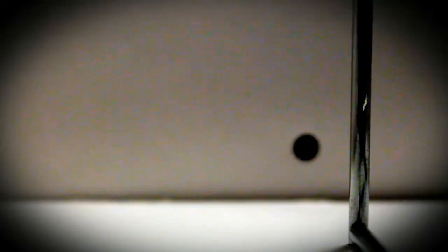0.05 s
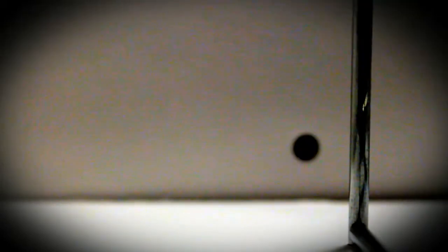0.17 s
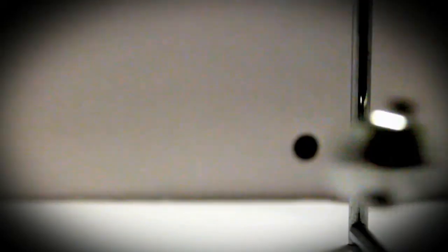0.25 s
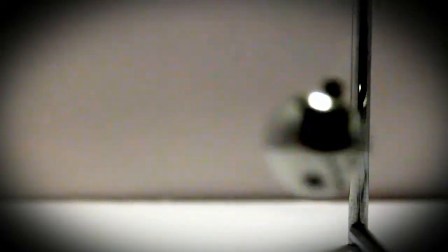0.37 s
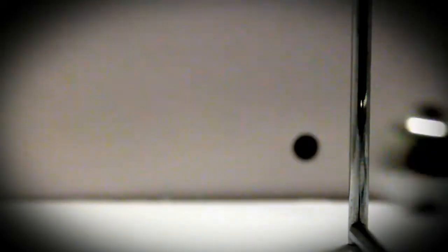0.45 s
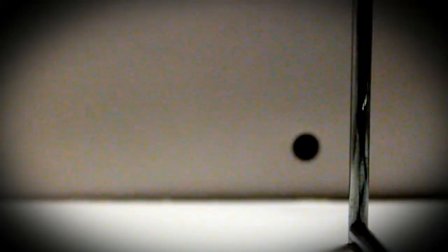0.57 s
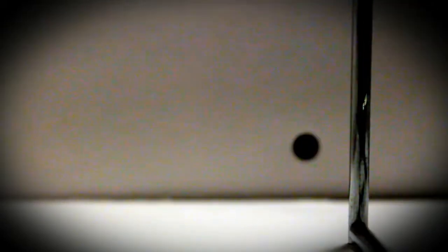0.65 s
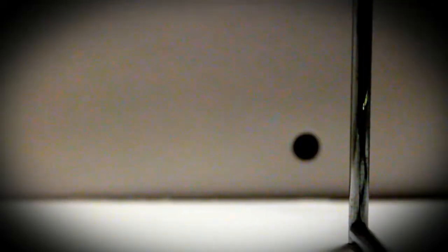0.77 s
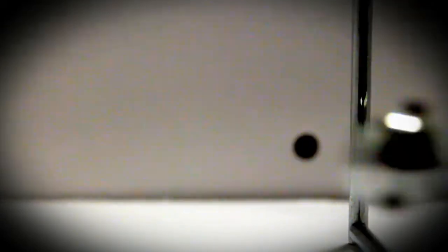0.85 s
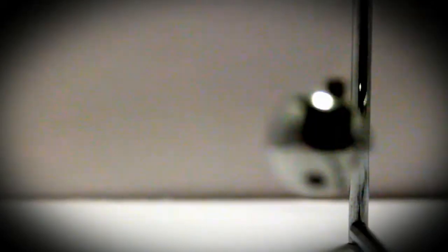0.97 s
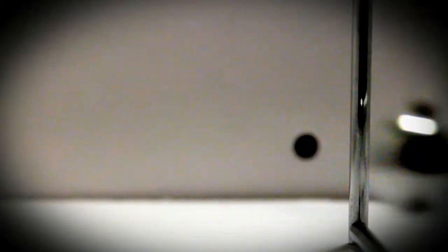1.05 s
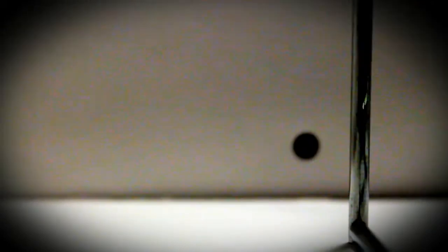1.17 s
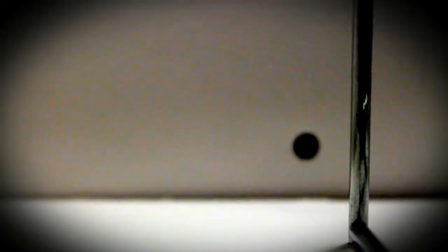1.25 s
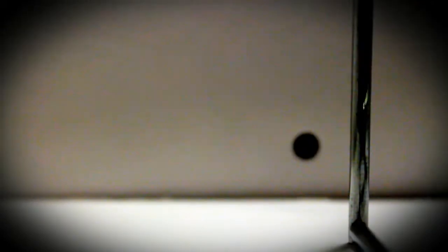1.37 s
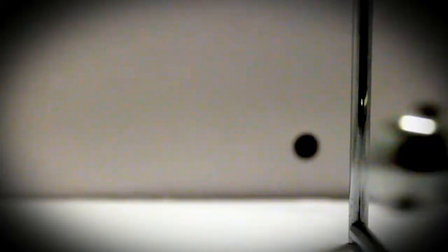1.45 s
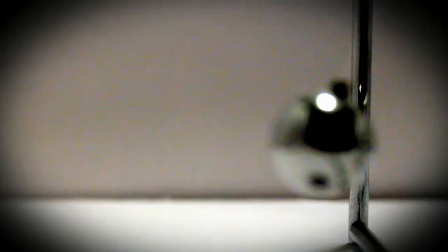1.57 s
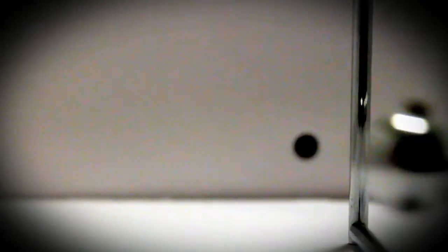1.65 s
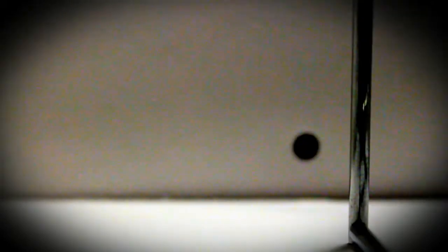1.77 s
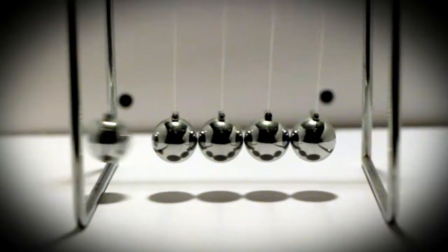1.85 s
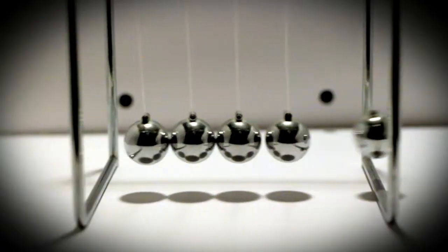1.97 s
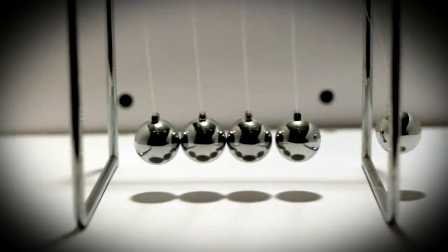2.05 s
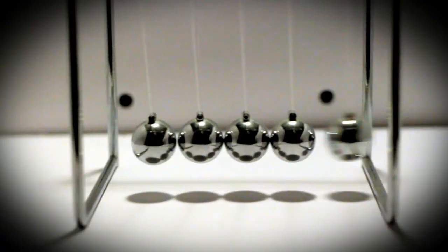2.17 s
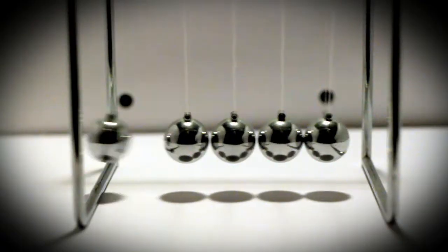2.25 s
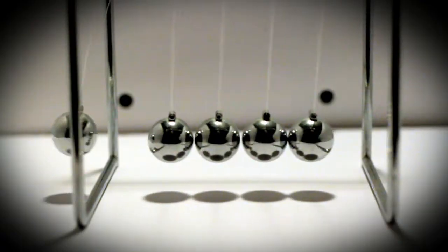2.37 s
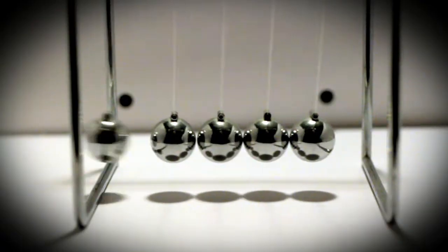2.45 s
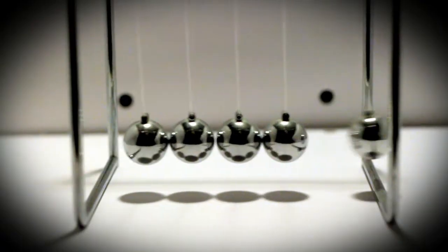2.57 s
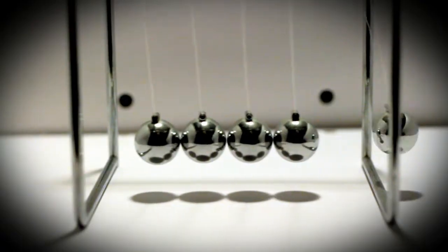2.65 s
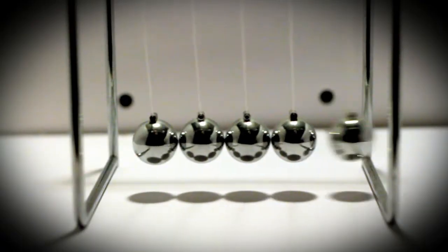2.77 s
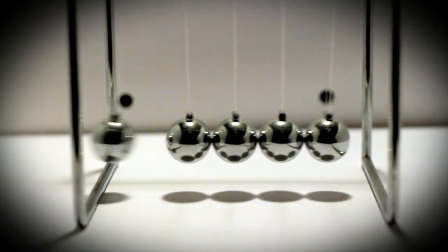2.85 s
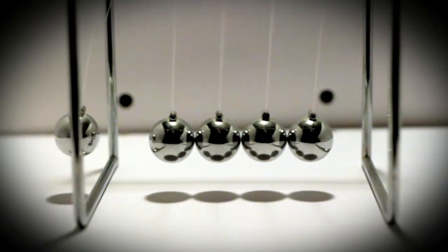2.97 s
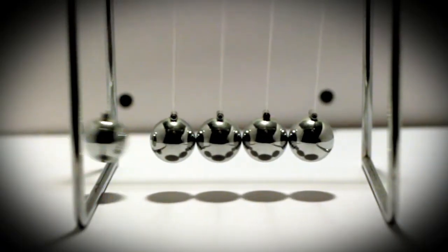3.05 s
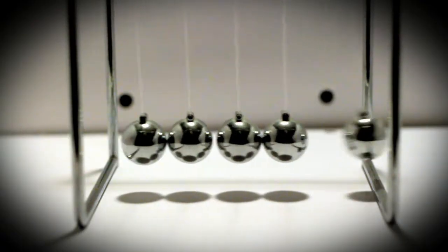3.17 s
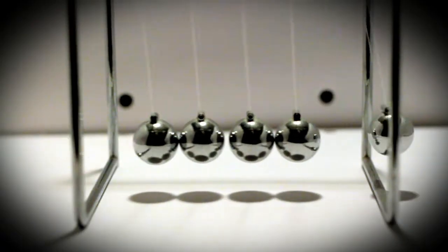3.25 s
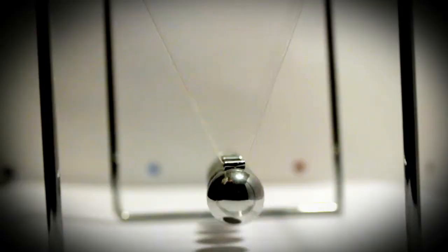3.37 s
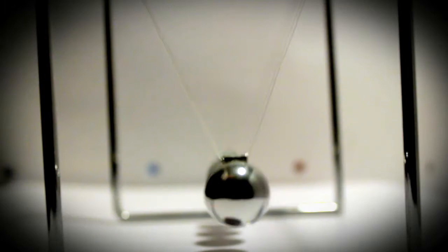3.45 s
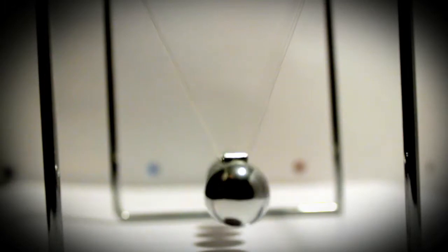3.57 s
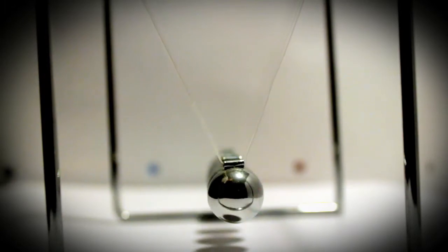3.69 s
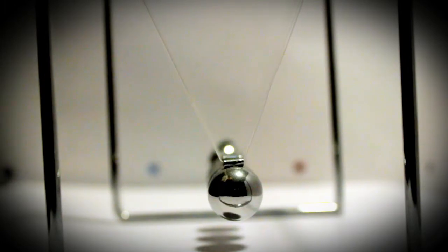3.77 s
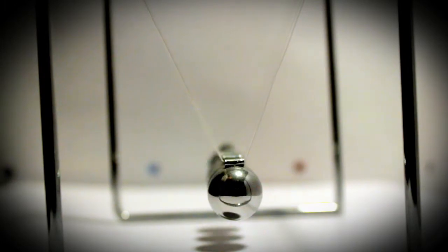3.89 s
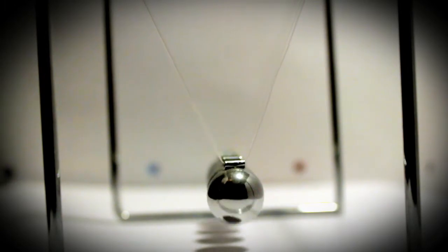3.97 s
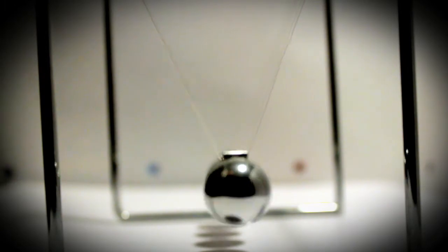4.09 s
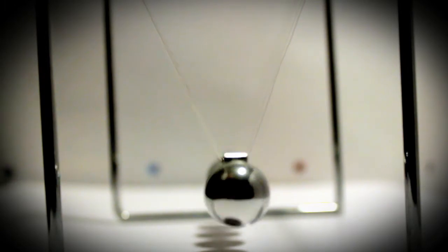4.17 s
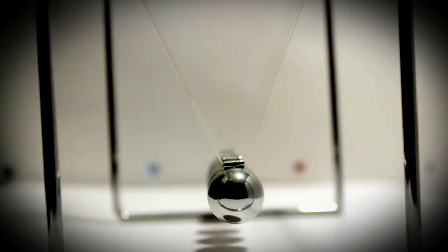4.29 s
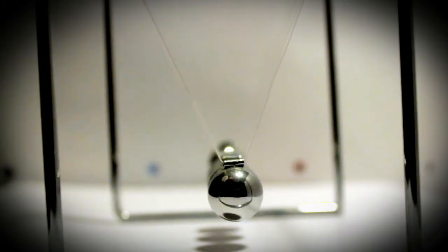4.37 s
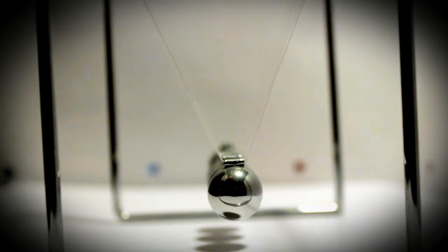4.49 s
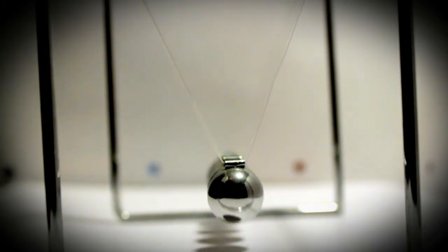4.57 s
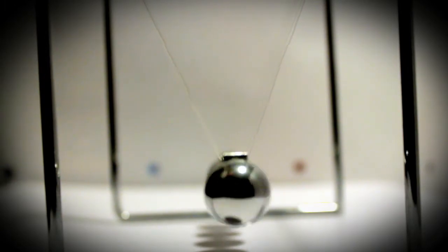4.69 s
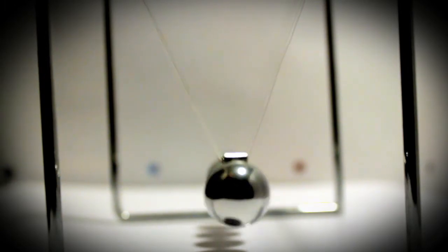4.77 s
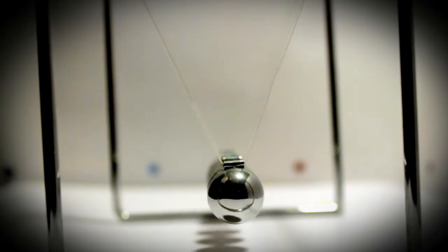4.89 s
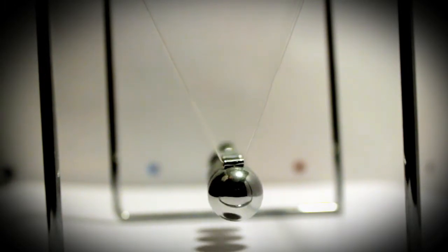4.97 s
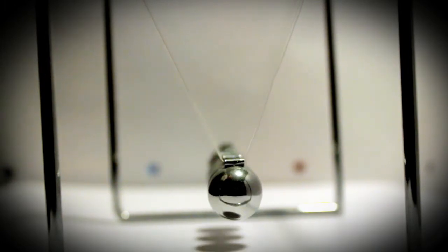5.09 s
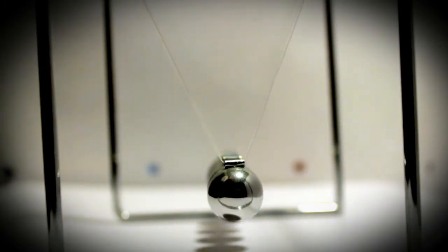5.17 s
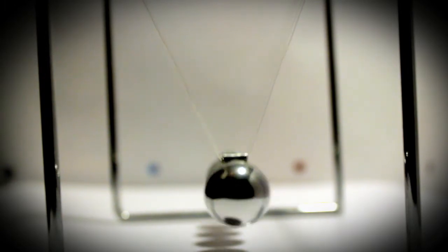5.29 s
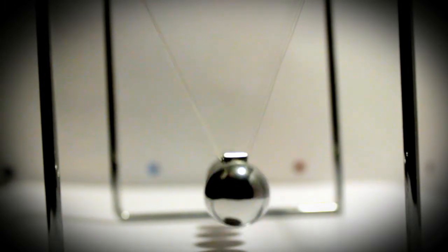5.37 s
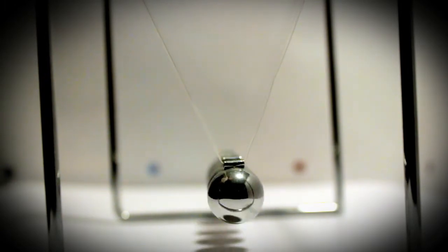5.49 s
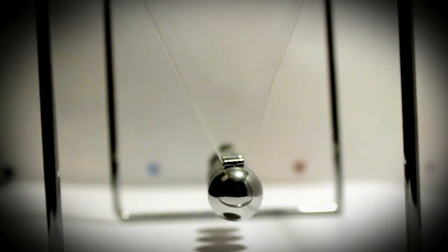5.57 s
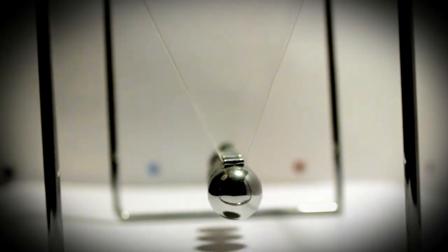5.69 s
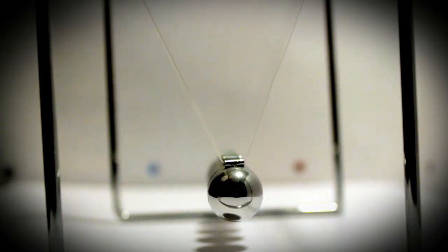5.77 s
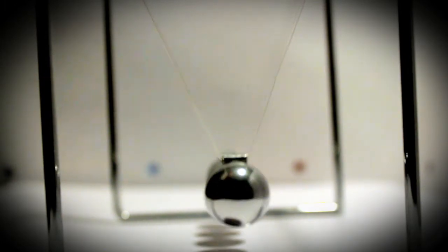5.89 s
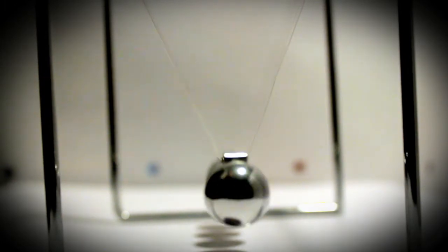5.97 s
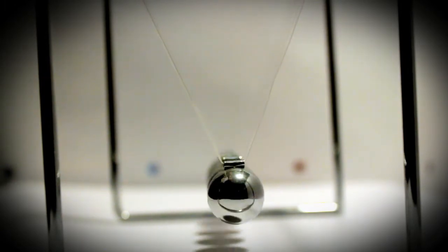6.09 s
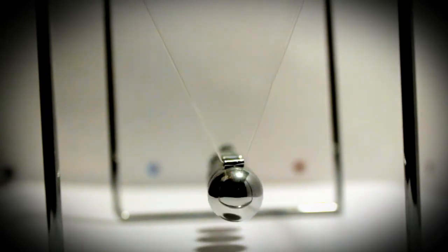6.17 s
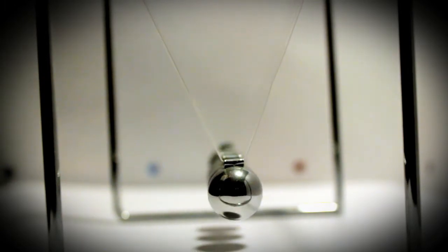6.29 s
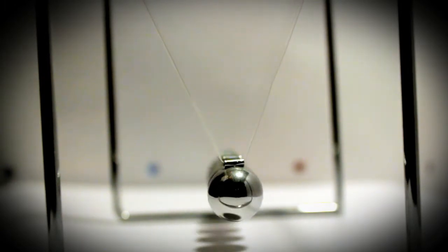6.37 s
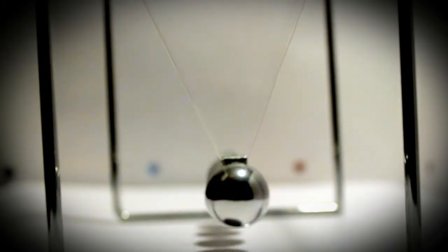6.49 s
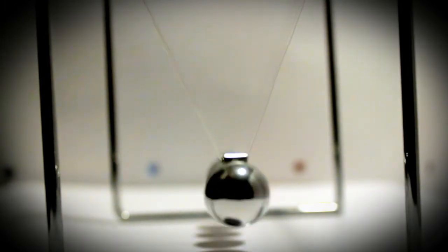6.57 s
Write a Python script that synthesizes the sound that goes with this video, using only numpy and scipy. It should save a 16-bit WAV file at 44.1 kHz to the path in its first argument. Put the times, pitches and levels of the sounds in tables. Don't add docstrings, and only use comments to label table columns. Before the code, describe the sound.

Bright, dry metallic clacks from a row of hanging steel balls, about three per second, gradually weakening over quiet hiss in a small room.

```python
import sys
import numpy as np
from scipy import signal
from scipy.fft import rfft, irfft
from scipy.io import wavfile
from scipy.ndimage import uniform_filter1d

SR = 44100
rng = np.random.default_rng(int(sys.argv[2]) if len(sys.argv) > 2 else 0)


def to_wav(sig):
    pcm = np.clip(np.atleast_2d(sig), -1, 1) * 32767
    pcm = np.round(pcm).astype(np.int16)
    wavfile.write(sys.argv[1], SR, pcm.T)


def boost_factor(decibels):
    exponent = np.asarray(decibels, float) / 20
    return 10 ** exponent


N = 292383
SPAN = 16384
T = np.arange(SPAN) / SR
HZ = np.fft.rfftfreq(SPAN, 1 / SR)
TOP_HZ = 15830

# (frequency [Hz], level [dB])
PULSE = [(1200, -26), (2200, -13.5), (3500, -11.5), (5100, -7), (7000, -3), (9000, -4.5), (11500, 0),
         (13500, -2), (15600, -5), (15950, -17), (16700, -39), (17000, -59)]
DIP_HZ, DIP_WIDTH_HZ, DIP_DB = 4260, 100, -6
# (time [s], strength [dB], level at 3.6 kHz [dB], level at 6 kHz [dB])
LANDINGS = [(.09721, -11, -1.5, -2.5), (.40041, -11.5, 2.3, -.5), (.70196, -13, -0.3, 3),
            (1.0058, -11, -0.7, 0), (1.30669, -10.5, -1, -1.5), (1.60989, -12.5, -0.5, -1.5),
            (1.91027, -12, -3.5, -1.8), (2.21375, -11.5, -0.5, -0.5), (2.51424, -13.5, -0.5, 0),
            (2.81739, -13, -4.5, -0.5), (3.11786, -15.5, 4.5, -3), (3.41975, -14.5, 1.5, -0.5),
            (3.71997, -14, 0.5, -3.5), (4.02404, -16.3, 0, 2.5), (4.32168, -16.5, -1.7, 1.5),
            (4.62446, -16, 0, 0.3), (4.92346, -18.5, 2, 1.5), (5.22607, -16.5, -1.6, 0.5),
            (5.52477, -14, 0.5, -2), (5.82661, -17.5, -4.5, 0.7), (6.1248, -18.5, -1.5, 3.5),
            (6.42593, -18.5, 2, -3)]
RUN_MS = [.5, 1.6, 1.6, .9, .7, 1.3, 2.1, 2.1, 1.2, 1.2, .7, 2.6, 1.5, .3, 1.9, 2.6, 1.7, 1, .9, 1, 1, 1.5]
FACING_HZ = [1500, 3600, 6000, 9500, 14500]
FACING_TOP_DB = -3
GRAZE_S, GRAZE_DB = 4.0209, -21
LEAD = 512
EVEN_BINS = 800


def cradle():
    pulse = gains(HZ, PULSE)
    dip_db = DIP_DB * np.exp(-((HZ - DIP_HZ) / DIP_WIDTH_HZ) ** 2)
    pulse = boost_factor(-0.74 + dip_db) * pulse / irfft(pulse)[0]
    places = np.array([[surroundings(side) for gap in range(4)] for side in (0, 1)])
    chance = rng.standard_normal((len(LANDINGS), 2, 6))
    out = np.zeros(N + SPAN)
    for k, (s, db, low_db, mid_db) in enumerate(LANDINGS):
        start = int(s * SR) - LEAD
        late_s, size = contacts(RUN_MS[k], db, chance[k])
        hits = taps(s + late_s - start / SR, size)
        power = abs(hits.sum(axis=0)) ** 2
        broad = uniform_filter1d(power, size=EVEN_BINS) / boost_factor(db) ** 2
        side, gaps = k % 2, (k // 2 + np.arange(6)) % 4
        blow = hits / np.sqrt(broad) * places[side, gaps]
        facing = gains(HZ, list(zip(FACING_HZ, [0, low_db, mid_db, 0, FACING_TOP_DB])))
        out[start:start + SPAN] += irfft(pulse * facing * blow.sum(axis=0))
    start = int(GRAZE_S * SR) - LEAD
    graze = taps([LEAD / SR], [boost_factor(GRAZE_DB)])[0]
    out[start:start + SPAN] += irfft(pulse * graze * places[1, 0])
    return out[:N]


SECOND_MS, SECOND_SPREAD_MS = .16, .035
RUN_LOSS_DB, CONTACT_SCATTER_DB = -7, 2.2
UNEVEN = .95


def contacts(run_ms, db, chance):
    early = UNEVEN * (1 + np.tanh(chance[0, :4])) / 2
    steps = (np.arange(1, 5) - early) / 4
    second_ms = SECOND_MS + SECOND_SPREAD_MS * chance[0, 4]
    ms = np.r_[0, second_ms, second_ms + steps * run_ms]
    size = boost_factor(RUN_LOSS_DB * np.r_[0, 0, steps] + CONTACT_SCATTER_DB * chance[1])
    return ms / 1000, boost_factor(db) * size / np.linalg.norm(size)


# (delay [ms], share of the direct pulse [1])
NEAR = [(.35, .28), (.612, .8), (.845, .42), (.935, -.3), (1.055, .22), (1.4, .18), (1.68, .25),
        (2.14, .17), (2.61, .16)]
# (frequency [Hz], level [dB])
NEAR_COLOUR = [(1500, -16), (2400, -4.5), (3600, 0.35), (15000, 3.5)]
SCATTER_DB, SCATTER_T60_S = -18, .0145
# (delay [ms], level after left landing [dB], level after right landing [dB], smear [ms], centre [Hz])
WALLS = [(11, -16, -26, .3, 4500), (11.2, -27, -29, .5, 10000), (12.4, -30, -25, .4, 8000),
         (13.3, -21, -21, .5, 14500), (16.6, -15, -20.5, .45, 15000), (17, -30, -31, .5, 11000),
         (21.2, -27, -26, .7, 11500)]
ROOM_DB, ROOM_GAP_DB, ROOM_START_MS = -27.5, -10, 10.4
# (frequency [Hz], T60 [s])
ROOM_T60 = [(2000, 0.12), (5000, 0.19), (10000, 0.17), (15000, 0.14)]
# (frequency [Hz], level [dB])
ROOM_COLOUR = [(1500, -17), (3000, 4.5), (5000, 3.5), (7000, -0.1), (10000, 2), (13000, 5.5), (15800, 10)]


def surroundings(side):
    ms, size = np.transpose(NEAR)
    scatter_grain, room_grain, wall_grain = rng.standard_normal((3, SPAN))
    scatter = rfft(boost_factor(SCATTER_DB) * scatter_grain * fade(T - .0011, SCATTER_T60_S))
    near = (taps(ms / 1000, size).sum(axis=0) + scatter) * gains(HZ, NEAR_COLOUR)
    walls = 0
    for delay_ms, *db, smear_ms, hz in WALLS:
        burst = rfft(wall_grain * np.exp(-((T * 1000 - delay_ms) / smear_ms) ** 2))
        band = np.exp(-(np.log2((HZ + 1) / hz) / .5) ** 2)
        walls = walls + boost_factor(db[side]) * burst * band
    rise = np.where(T * 1000 < ROOM_START_MS, boost_factor(ROOM_GAP_DB), 1) * (T > .002)
    diffuse = 0
    centres = [f for f, _ in ROOM_T60]
    for hz, t60 in ROOM_T60:
        share = np.interp(HZ, centres, [f == hz for f in centres])
        diffuse = diffuse + share * rfft(rise * fade(T, t60) * room_grain)
    room = walls + boost_factor(ROOM_DB) * diffuse * gains(HZ, ROOM_COLOUR)
    return 1 + near + room * (HZ < TOP_HZ)


# (time [s], peak [dB], frequency [Hz], width [Hz], room tail [dB])
KNOCKS = [(1.4771, -39.5, 1160, 300, -11), (1.4777, -40.5, 2470, 350, -14), (1.477, -42, 1630, 400, -13),
          (1.4795, -47.5, 920, 200, -5), (5.3697, -46, 626, 400, -20), (5.3698, -44, 1500, 900, -16),
          (5.3706, -49, 346, 80, -20), (1.93, -55, 170, 90, -4), (4.395, -55, 620, 300, -3),
          (4.415, -51, 450, 200, -9), (4.431, -51, 306, 90, -10), (4.446, -54.5, 131, 30.2, -4)]
KNOCK_T60_S = 0.22


def knocks():
    out = np.zeros(N)
    for s, db, hz, width, tail_db in KNOCKS:
        half_cycle = -np.sin(2 * np.pi * hz * T) * (T < .5 / hz)
        tap = ring(half_cycle, hz, width)
        tail = ring(ring(rng.standard_normal(SPAN), hz, 2 * width), hz, 2 * width)
        tail = tail / tail.std() * np.clip(T / .01, 0, 1) * fade(T, KNOCK_T60_S)
        i = int(s * SR)
        out[i:i + SPAN] += boost_factor(db) * (tap / np.abs(tap).max() + boost_factor(tail_db) * tail)
    return out


# (frequency [Hz], level per Hz [dB])
HISS = [(12, -12), (20, -12), (27, -10.0), (64, -11.5), (196, -8.5), (238, -6.5), (306, -8.5), (342, -9.5),
        (491, -8.0), (857, -10.0), (1820, -12), (9390, -19.5), (15500, -23)][:-1] + [(15900, -21.5)]
HISS_DB, LINE_DB, DRONE_DB = -56.5, -74.5, -75
LINE_HZ, DRONE_HZ, DRONE_WIDTH_HZ = 98.3, 68, 9
BEAT_S, BEAT_NULL_S, BEAT_DEPTH = 0.692, 0.09, 0.9


def background():
    t = np.arange(N) / SR
    beat = 1 - BEAT_DEPTH * np.exp(2j * np.pi * (t - BEAT_NULL_S) / BEAT_S)
    line = level(np.imag(beat * np.exp(2j * np.pi * LINE_HZ * t)), LINE_DB)
    drone = ring(rng.standard_normal(N), DRONE_HZ, DRONE_WIDTH_HZ)
    drone = level(ring(drone, DRONE_HZ, DRONE_WIDTH_HZ), DRONE_DB)
    hz = np.fft.rfftfreq(N, 1 / SR)
    hiss = irfft(rfft(rng.standard_normal(N)) * gains(hz, HISS) * (hz < TOP_HZ), N)
    return level(hiss, HISS_DB) + line + drone


FLECKS_PER_S, FLECK_S, FLECK_DB = 4.8, .036, -71
FLECK_LOW_HZ, FLECK_HIGH_HZ = 4300, 15500


def flecks():
    out = np.zeros(N + SPAN)
    for when, where in rng.random((int(FLECKS_PER_S * N / SR), 2)):
        hz = FLECK_LOW_HZ * (FLECK_HIGH_HZ / FLECK_LOW_HZ) ** where
        band = irfft(rfft(rng.standard_normal(SPAN)) * (abs(HZ / hz - 1) < .08))
        i = int(when * N)
        out[i:i + SPAN] += level(band, FLECK_DB) * np.sin(np.pi * np.minimum(T / FLECK_S, 1))
    return out[:N] * np.array([[1], [-1]])


def level(x, db):
    return x * boost_factor(db) / np.sqrt(np.mean(x ** 2))


def gains(hz, points):
    f, db = np.transpose(points)
    return boost_factor(np.interp(np.log(hz + 1), np.log(f), db))


def taps(seconds, sizes):
    return np.asarray(sizes)[:, None] * np.exp(-2j * np.pi * np.outer(seconds, HZ))


def fade(t, t60):
    return (t >= 0) * np.exp(-np.log(1000) * np.maximum(t, 0) / t60)


def ring(x, hz, width):
    return signal.lfilter(*signal.iirpeak(hz, hz / width, SR), x)


def scene():
    return np.tile(cradle() + background() + knocks(), (2, 1))


def top_cut(x):
    return signal.sosfilt(signal.butter(12, 16970, fs=SR, output="sos"), x)


def record(dry):
    offset = .001
    mix = dry + offset + flecks()
    return top_cut(mix)


dry = scene()
out = record(dry)
to_wav(out)
```